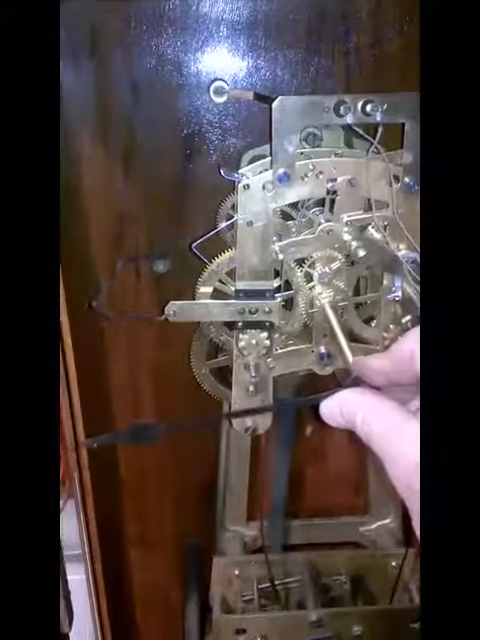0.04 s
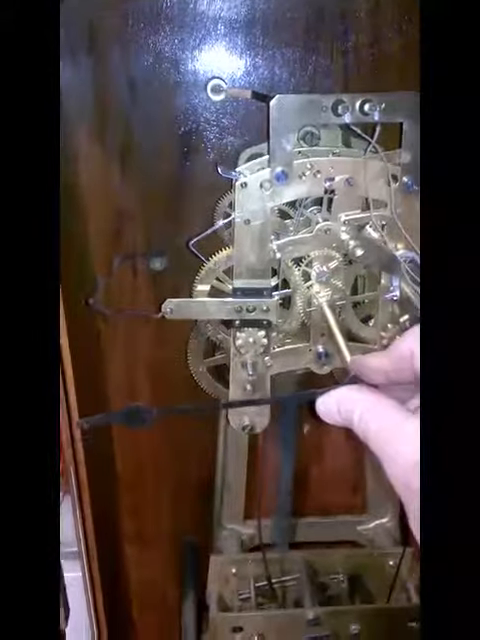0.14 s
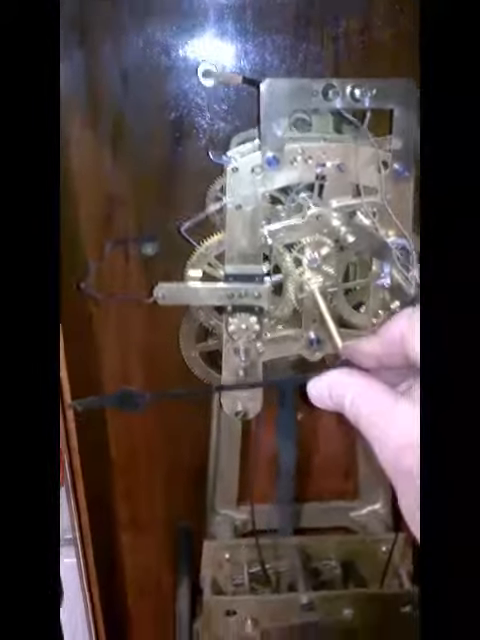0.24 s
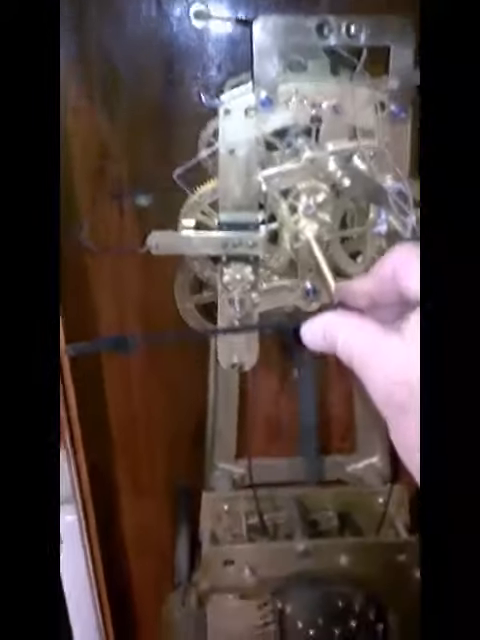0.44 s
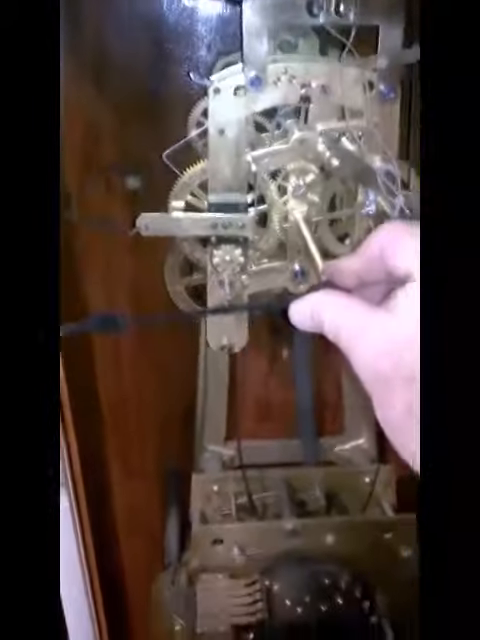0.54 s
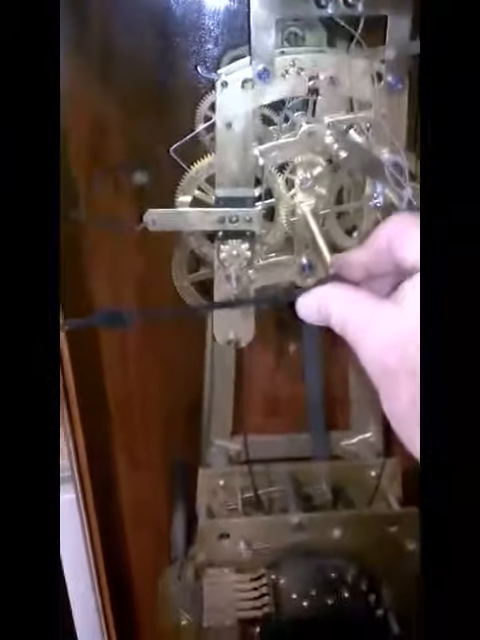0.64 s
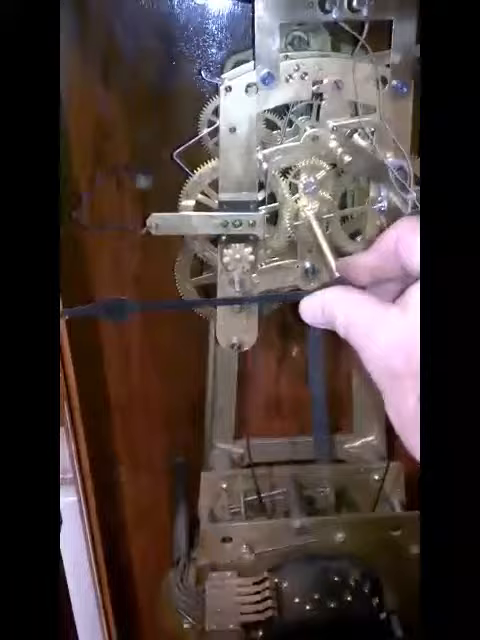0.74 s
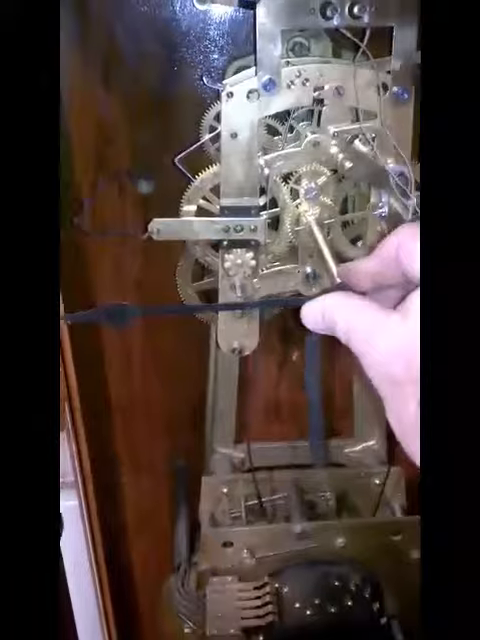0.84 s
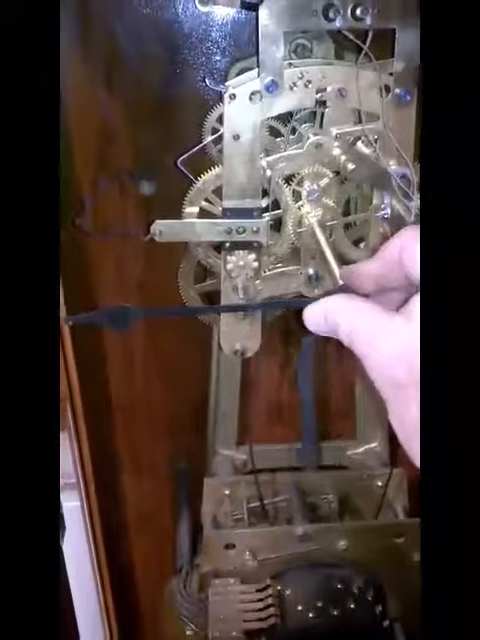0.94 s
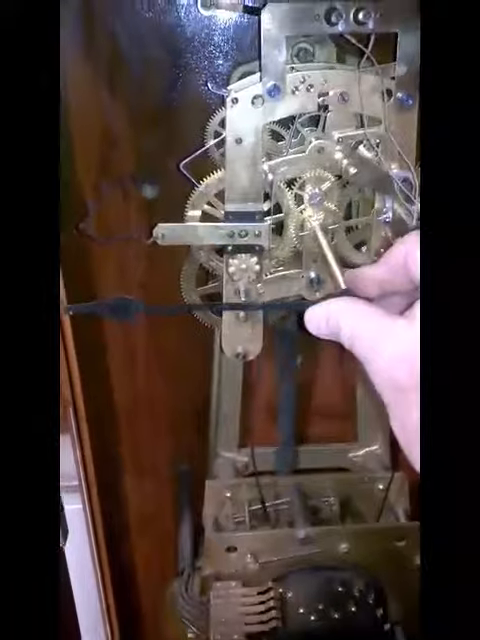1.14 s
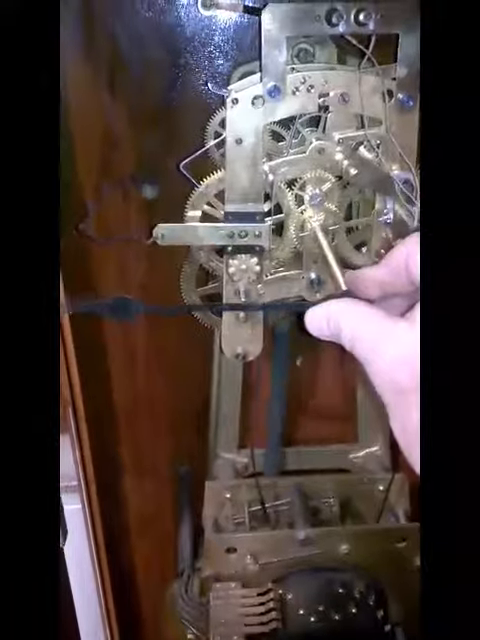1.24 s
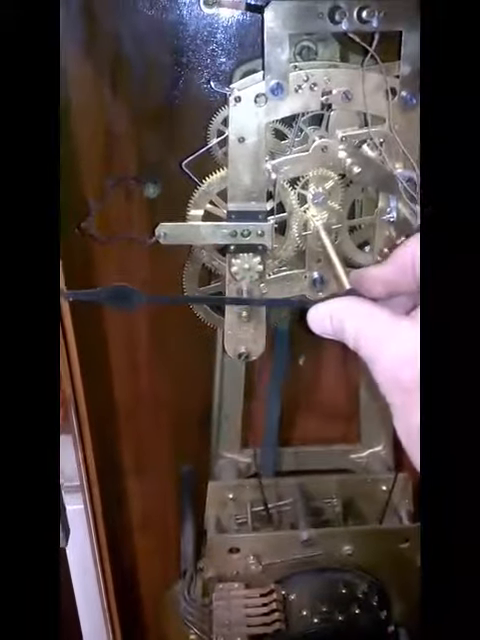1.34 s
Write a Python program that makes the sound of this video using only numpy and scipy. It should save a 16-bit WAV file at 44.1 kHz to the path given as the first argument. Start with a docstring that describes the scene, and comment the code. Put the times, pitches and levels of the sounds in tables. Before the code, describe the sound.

A clock mechanism's brass levers click and ring briefly, among low thumps on the microphone.

```python
"""Sharp, ringing clicks and dull thumps: a brass clock movement is worked by hand in a quiet room.
Its levers drop and set the plates and the wooden case ringing, close to a hand-held microphone.
Handling knocks on the microphone's body make the thumps. There are also small dry snaps as parts
catch and slip, a faint rub and a low rumble, with mains hum and a soft hiss underneath."""
import sys
import numpy as np
from scipy import signal
from scipy.fft import rfft, irfft
from scipy.io import wavfile

SR = 44100
rng = np.random.default_rng(int(sys.argv[2]) if len(sys.argv) > 2 else 0)


def master_out(mix):
    """Clip the mix to full scale and print it as 16-bit PCM to the path in sys.argv[1]."""
    frames = np.transpose(np.atleast_2d(mix))
    ceiling = np.clip(frames, -1, 1)
    pcm = np.round(ceiling * 32767).astype(np.int16)
    wavfile.write(sys.argv[1], SR, pcm)


N = 61739


def undb(db):
    """Turn decibels into a number to multiply by."""
    return 10 ** (np.asarray(db) / 20)


def unit(x):
    """Scale a sound to an average (rms) strength of 1."""
    return x / np.sqrt(np.mean(x ** 2))


def filtered(x, response):
    """Reshape the tone of x; response gives the gain at each frequency."""
    return irfft(rfft(x, 2 * N) * response(np.arange(N + 1) * SR / (2 * N) + 1e-6))[:N]


def shaped_noise(response):
    """Noise of strength 1 whose tone follows response."""
    f = np.fft.rfftfreq(N, 1 / SR) + 1e-6
    return unit(irfft(rfft(rng.standard_normal(N)) * response(f), N))


def noise(points):
    """Noise of strength 1 whose tone follows points of f/Hz, level/dB."""
    hz, db = np.array(points).T
    return shaped_noise(lambda f: undb(np.interp(np.log(f), np.log(hz), db)))


def curve(points):
    """A volume curve through points of t/s, level/dB."""
    times, db = np.array(points).T
    return undb(np.interp(np.arange(N) / SR, times, db))


def add(out, start_s, sound):
    """Mix a sound in from a given time on."""
    i = max(int(start_s * SR), 0)
    out[i:] += sound[:N - i]


def fade(t, ring_s):
    """Die away by 60 dB over the ring time."""
    return np.exp(-np.log(1000) * t / ring_s)


def hum_and_hiss(t):
    """Mains hum wavers in loudness over a steady hiss."""
    # tone of the hiss: f/Hz, level/dB
    hiss_tone = [(100, 5.5), (600, 4), (1400, 0), (2700, 1), (3600, -3), (5200, -3), (8000, -8.5),
                 (15000, -11)]
    hum_hz, hum_db, waver_db, hiss_db = 120.06, -55.5, 3.5, -75.5
    waver = np.interp(t, np.linspace(0, t[-1], 12), rng.standard_normal(12))
    hum = np.sqrt(2) * np.sin(2 * np.pi * (hum_hz * t + rng.random()))
    return undb(hum_db + waver_db * waver) * hum + undb(hiss_db) * noise(hiss_tone)


def rumble_and_rub():
    """The moving hand rumbles and rubs, stirring a few low resonances (favoured pitches)."""
    # loudness of the rumble: t/s, level/dB
    rumble_level = [(0, -63.5), (.07, -44), (.12, -48.5), (.17, -51), (.21, -40.5), (.26, -45.5),
                    (.37, -38), (.42, -50.5), (.51, -39), (.69, -41), (.78, -50.5), (.85, -45.5),
                    (.9, -54.5), (1.02, -48), (1.05, -50), (1.13, -45), (1.29, -50), (1.37, -42.5)]
    # tone of the rumble: f/Hz, level/dB
    rumble_tone = [(18, -10.5), (40, 9.5), (65, -0.5), (95, -4.5), (150, -9), (200, -18), (265, -19),
                   (330, -28), (600, -48.5), (1200, -73)]
    # loudness of the rubbing: t/s, level/dB
    rub_level = [(0, -79), (.09, -80.5), (.135, -60.5), (.2, -54), (.26, -65.5), (.32, -55), (.43, -61),
                 (.55, -58), (.69, -76), (.755, -62.5), (.82, -77), (.92, -69.5), (1.0, -68.5),
                 (1.08, -79.5), (1.27, -81.5), (1.37, -70.5)]
    # resonances that the rubbing stirs: f/Hz, width/Hz, level/dB
    rub_modes = [(270.5, 31, 3.5), (392.6, 43, 3), (505.7, 48, -5.5), (630, 150, -17.5), (910, 370, -26)]
    rub = shaped_noise(lambda f: sum(undb(db) / (1 + ((f - hz) / (width / 2)) ** 2)
                                     for hz, width, db in rub_modes))
    return curve(rumble_level) * noise(rumble_tone) + curve(rub_level) * rub


def lever_slides(t):
    """Brass slides on brass with a brief, soft hiss before a lever drops."""
    # each slide: t/s at its middle, half-length/s, level/dB
    slides = [(0.427, 0.0083, -74), (1.113, 0.012, -75.5)]
    # tone of the sliding: f/Hz, level/dB
    slide_tone = [(2000, -7.5), (3500, -6), (5000, -5), (6500, -16), (12000, -47)]
    swells = sum(undb(db) * np.exp(-.5 * ((t - at) / half_s) ** 2) for at, half_s, db in slides)
    return noise(slide_tone) * swells


def dry_snaps(t):
    """Parts catch and slip, each making a few quick wiggles that do not ring on."""
    # each snap: t/s at its middle, f/Hz, level/dB, half-length/cycles
    snaps = [(.151, 965, -60.5, 1.9), (.3212, 1660, -53.5, 1.03), (.3225, 520, -42, .6),
             (0.34, 1380, -61, 0.89), (.3415, 517, -34, 0.55), (0.45, 2650, -60, 2.3),
             (.453, 800, -41, 0.91), (.4535, 1680, -48, 1.67), (.531, 1040, -56, 0.57),
             (.575, 830, -52.5, 0.49), (.5865, 1300, -57, .6), (.6272, 710, -41.5, 0.36),
             (1.1402, 2870, -55.5, 2.2)]
    out = np.zeros(N)
    for at, hz, db, half_length in snaps:
        cycles = hz * (t - at)
        out += undb(db) * np.sin(2 * np.pi * cycles) * np.exp(-.5 * (cycles / half_length) ** 2)
    return out


def handling_thumps(t):
    """Handling knocks on the microphone's body make dull, low thumps; longer contact sounds deeper."""
    # each knock: t/s, relative level/dB, contact time/ms
    knocks = [(0.049, -13.5, 5.8), (.197, -11, 4.2), (.215, -6.5, 2.6), (0.2256, -12, 0.94),
              (0.304, -13.5, 1.8), (0.324, -6.5, 1.08), (0.339, -15, 0.84), (0.353, -6, 10),
              (.4521, 1.5, 0.8), (0.4715, -12, 0.3), (0.5279, -13, 0.64), (0.539, -10, 12),
              (.574, 0.5, 0.91), (.593, -7.5, 2.2), (0.6255, -3, 0.51), (0.746, -40, 0.29),
              (1.012, -4, 4.3), (1.082, -5.5, 3.64)]
    # quickly dying resonances of the microphone body: f/Hz, width/Hz, level/dB
    microphone_modes = [(45.7, 28, 1), (89.2, 35.7, 3), (162, 88, -8), (236, 43, -5)]
    boost_db, band_hz = 25, [39, 398]
    force = np.zeros(N)
    for start, db, contact_ms in knocks:
        progress = 2 * t / (contact_ms / 1000)
        knock = progress ** 3 * np.exp(-progress)  # builds up smoothly, then lets go
        add(force, start, undb(db + boost_db) * knock / knock.sum())
    force = signal.sosfilt(signal.butter(2, band_hz, "band", fs=SR, output="sos"), force)
    return filtered(force, lambda f: sum(undb(db) / (1 + 1j * (f * f - hz * hz) / (f * width))
                                         for hz, width, db in microphone_modes))


def lever_clicks(t):
    """A dropping lever rings the plates and case, with a clatter; where it lands sets the tone."""
    # each drop: t/s, relative level/dB, brightness/Hz, place (0 = heavy lever, 1 = light lever)
    drops = [(.150, -15, 695, 1), (.448, -11.5, 3500, .2), (.452, 0.5, 2800, 0.36), (.471, -8.5, 1005, 0),
             (.742, -33, 600, 0.029), (1.140, -10.5, 3500, 1), (1.143, -7, 2970, 0.98),
             (1.157, -12, 920, 0.84)]
    # ringing tones of plates and case: f/Hz, heavy-lever level/dB, light-lever level/dB, ring time/s
    plate_modes = [(631, 0, -3, .16), (820, 3, -14, .1), (920, 2, 3, .12), (970, -2, 0, .11),
                   (1061, -6, 1, .11), (1139, -4, -13, .11), (1348, -13, -18, .11), (1567, 1, -2, .08),
                   (1668, -2, -18, .07), (1930, -3, -16, .09), (2222, -3, -9, .09), (2310, -16, -4, .08),
                   (2453, -4, -20, .08), (2724, -20, -1, .045), (3000, -7, -13, .06), (3300, -24, -4, .05),
                   (4100, -6, -22, .03), (4517, -28, 3, .08)]
    # noisy ring of the gears and the room: f/Hz, level/dB, ring time/s
    clatter_bands = [(470, -7, .18), (650, -8, 0.16), (972, -4.5, 0.12), (1660, -9, 0.062),
                     (2130, -8, 0.058), (2960, -22.5, 0.03), (4330, -15, 0.094)]
    plate_gain_db, clatter_gain_db, soften_hz = -54, -47, 6500
    out = np.zeros(N)
    for start, db, bright_hz, place in drops:
        ring = np.zeros(N)
        for k, (hz, heavy_db, light_db, ring_s) in enumerate(plate_modes):
            gain = undb(np.interp(place, [0, 1], [heavy_db, light_db]) + plate_gain_db)
            direction = (-1) ** k  # every other tone starts by swinging the opposite way
            ring += direction * gain * fade(t, ring_s) * np.sin(2 * np.pi * hz * t)
        for hz, band_db, ring_s in clatter_bands:
            band = signal.butter(3, [hz / 1.24, hz * 1.24], "band", fs=SR, output="sos")
            clatter = unit(signal.sosfilt(band, rng.standard_normal(N)))
            ring += undb(band_db + clatter_gain_db) * fade(t, ring_s) * clatter
        treble_cut = signal.butter(1, bright_hz, fs=SR)
        add(out, start, undb(db) * signal.lfilter(*treble_cut, ring))
    return filtered(out, lambda f: 1 / (1 + 1j * f / soften_hz) ** 2)


def scene():
    """Add all the sounds together in one channel."""
    t = np.arange(N) / SR
    background = hum_and_hiss(t) + rumble_and_rub()
    return (background + lever_slides(t) + dry_snaps(t) + handling_thumps(t) + lever_clicks(t))[None]


def record(dry):
    """Fade both ends briefly and cut the highest treble."""
    edge_s, top_hz = .008, 15750
    t = np.arange(N) / SR
    to_edge_s = np.minimum(t, t[-1] - t)
    ease = np.sin(np.pi / 2 * np.minimum(to_edge_s / edge_s, 1)) ** 2
    return signal.sosfilt(signal.ellip(10, .2, 70, top_hz, fs=SR, output="sos"), dry * ease)


dry = scene()
out = record(dry)
master_out(out)
```